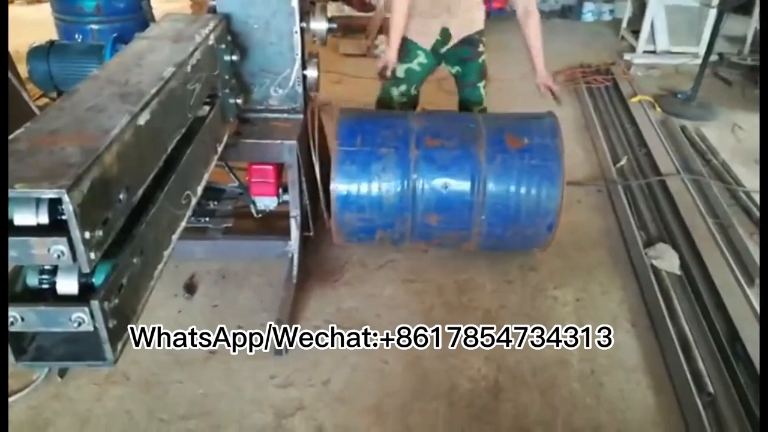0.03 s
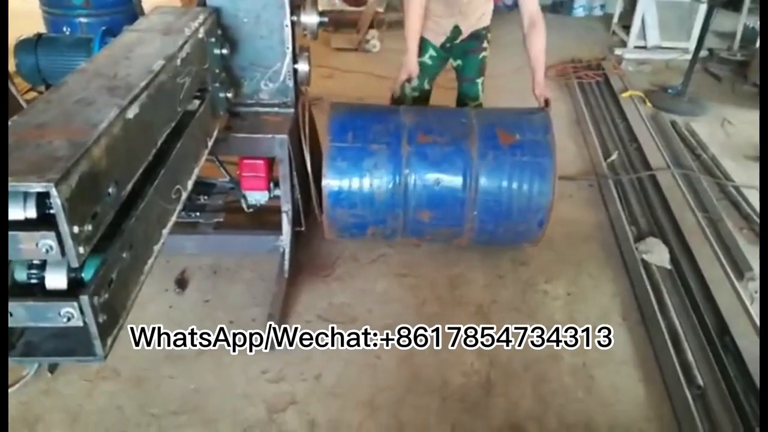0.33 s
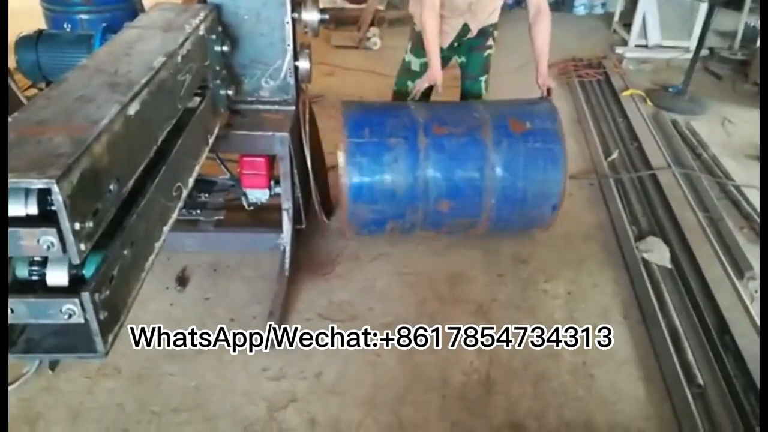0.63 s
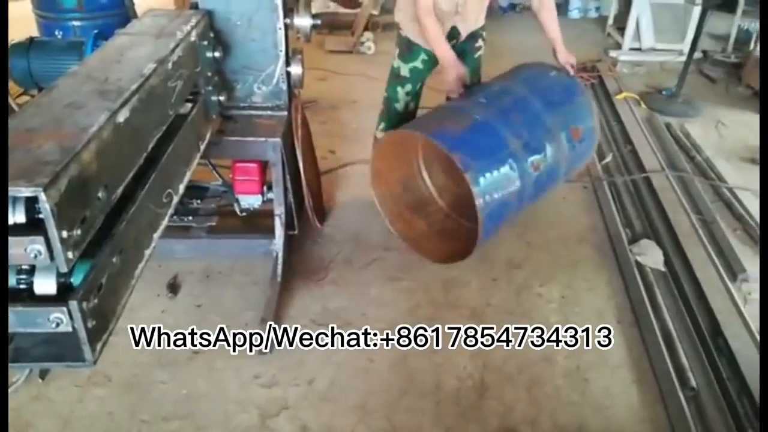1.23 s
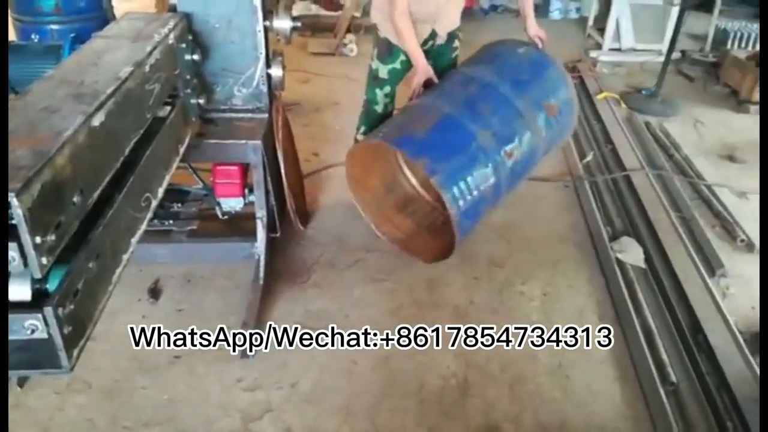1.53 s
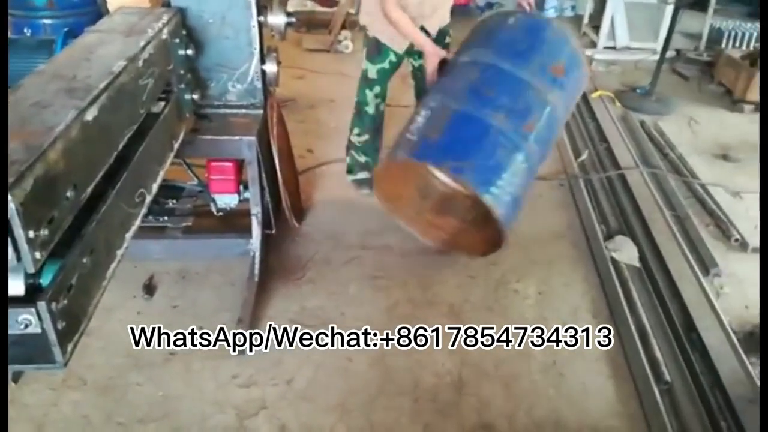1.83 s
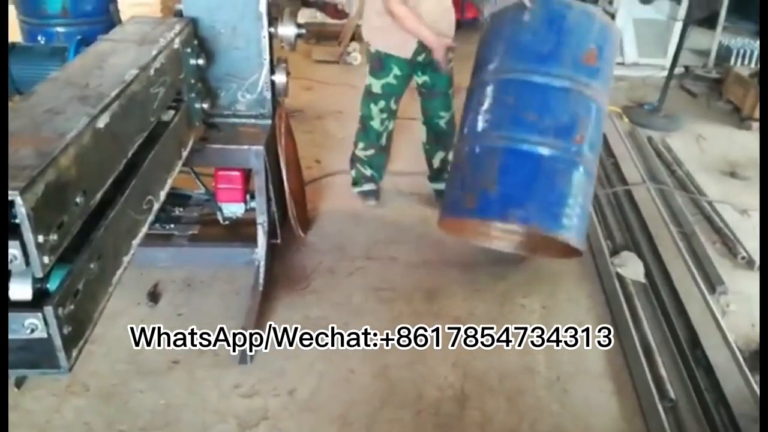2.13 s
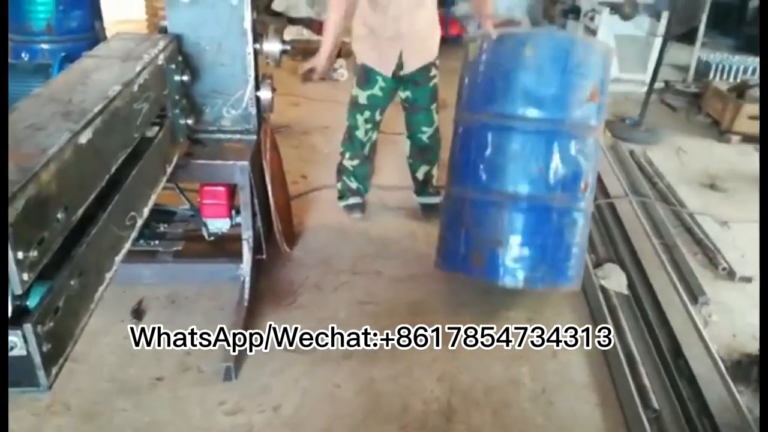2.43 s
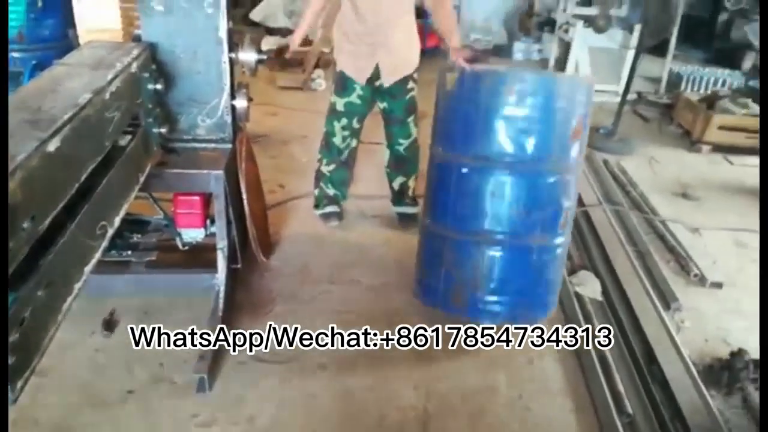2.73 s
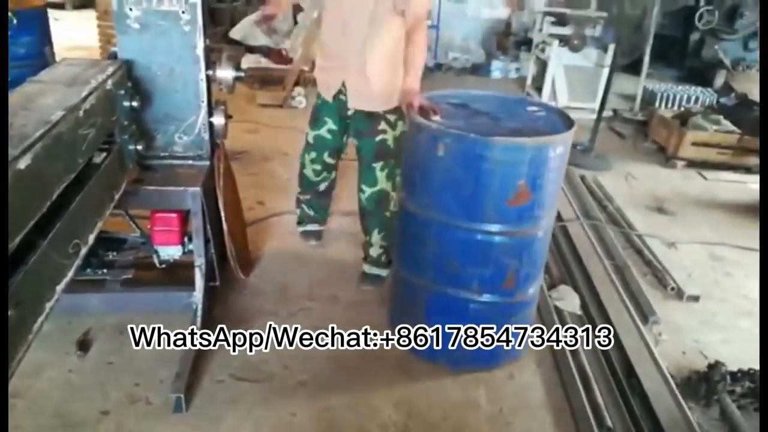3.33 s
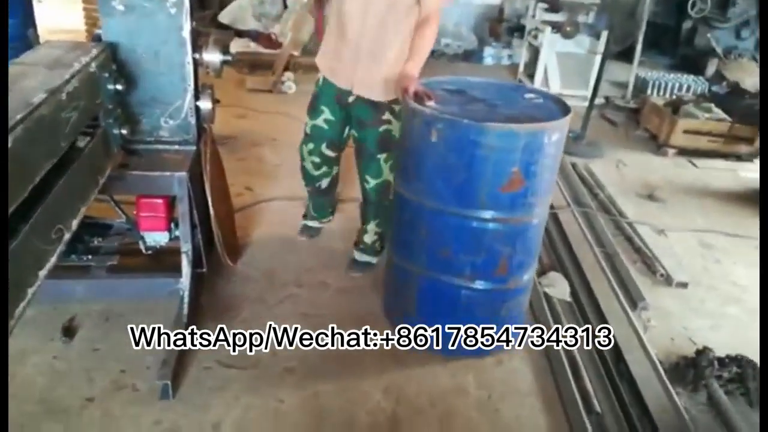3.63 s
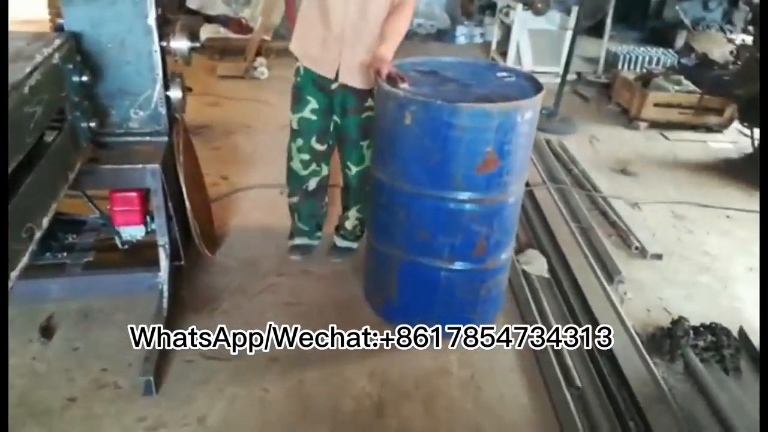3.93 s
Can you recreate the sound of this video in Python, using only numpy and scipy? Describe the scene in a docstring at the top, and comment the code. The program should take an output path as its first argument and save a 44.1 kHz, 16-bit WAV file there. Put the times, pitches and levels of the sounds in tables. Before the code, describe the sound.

Close by in a workshop, a hollow metal barrel grinds and rings on its rim, rocks onto the concrete with several deep bumps and scrapes to a stop. A machine hisses behind it throughout.

```python
"""Workshop, concrete floor: an empty open-ended steel drum is dragged, swung upright on its rim, set
down and slid. Grit under the rim, which catches now and then, sets the shell ringing; the drum booms
as it rocks on to the floor. A machine hisses on the right throughout; at the very end something
there clicks and a thin whine starts."""
import sys
import numpy as np
from scipy import signal
from scipy.io import wavfile

SR = 44100
rng = np.random.default_rng(int(sys.argv[2]) if len(sys.argv) > 2 else 0)


def to_wav(sig):
    """Store sig (one row per channel, or 1-D mono) as 16-bit WAV at the path in sys.argv[1].

    Samples outside -1..1 are clipped; the rate is SR.
    """
    pcm = np.clip(np.atleast_2d(sig), -1, 1) * 32767
    pcm = np.round(pcm).astype(np.int16)
    wavfile.write(sys.argv[1], SR, pcm.T)  # frames by channels


N = 176400
T = np.arange(N) / SR
BAND_EDGES_HZ = np.geomspace(32, 8600, 23)
BAND_CENTRES_HZ = np.sqrt(BAND_EDGES_HZ[1:] * BAND_EDGES_HZ[:-1])
LIFT_S, SET_DOWN_S = 1.45, 2.8


def from_db(db):
    """Decibels to gain."""
    return 10 ** (np.asarray(db) / 20)


def at_hz(table, hz):
    """Table lookup on a log-frequency axis."""
    freqs, values = np.transpose(table)
    return np.interp(np.log(hz), np.log(freqs), values)


def pan(left_minus_right_db):
    """Constant-power left and right gains."""
    gains = from_db([[left_minus_right_db / 2], [-left_minus_right_db / 2]])
    return gains / np.sqrt(np.mean(gains ** 2))


def drift(rate_hz):
    """Slow random wander, standard deviation 1."""
    pole = np.exp(-2 * np.pi * rate_hz / SR)
    slow = signal.lfilter([1], [1, -2 * pole, pole * pole], rng.standard_normal(N + SR))[SR:]
    return slow / slow.std()


def band(x, k):
    """Band k of the filter bank."""
    bandpass = signal.butter(2, BAND_EDGES_HZ[k:k + 2], "band", fs=SR, output="sos")
    return signal.sosfilt(bandpass, x + 1e-18)


def resonance(x, hz, width_hz):
    """Two-pole resonator, peak gain 1."""
    radius = np.exp(-np.pi * width_hz / SR)
    feedforward = np.array([1, 0, -1]) * (1 - radius ** 2) / 2
    feedback = [1, -2 * radius * np.cos(2 * np.pi * hz / SR), radius ** 2]
    return signal.lfilter(feedforward, feedback, x + 1e-18)


def mode_width_hz(t60_s):
    """Bandwidth of a mode with this ring time."""
    return np.log(1000) / (np.pi * t60_s)


def stereo_noise(k, correlation_table, size):
    """Noise in band k, partly correlated between the ears."""
    mid, side = band(rng.standard_normal((2, size + SR // 4)), k)[:, -size:]
    correlation = np.clip(at_hz(correlation_table, BAND_CENTRES_HZ[k]), 0, 1)
    return np.sqrt((1 + correlation) / 2) * mid + np.sqrt((1 - correlation) / 2) * np.array([side, -side])


# hiss spectrum: f/Hz, density/dB
HISS_SPECTRUM = [(40, -22.5), (120, -36.5), (300, -38), (550, -40), (1000, -34), (2100, -40), (3200, -28),
                 (4200, -38), (5100, -46.5), (6200, -35.5), (7300, -62)]
# metallic resonances: f/Hz, width/Hz, level/dB
HISS_PEAKS = [(2760, 70, -25), (3037, 90, -25), (3190, 110, -21.5), (3420, 70, -22.5), (3570, 70, -25),
              (5900, 240, -30)]
# hiss direction: f/Hz, L-R/dB
HISS_PAN = [(300, -2.5), (700, -1.5), (1300, -2), (2400, -11), (7000, -9.5)]
# hiss coherence: f/Hz, L-R correlation
HISS_CORRELATION = [(130, 1), (300, 0.27), (700, 0.076), (3000, .05)]
# hiss envelope: t/s, level/dB
HISS_LEVEL = [(.165, -9), (.2, -4), (.4, -2.5), (1.4, -1), (2.7, -2.5), (3.8, -2)]


def machine_hiss():
    """A machine on the right hisses steadily, with metallic resonances."""
    hiss = 0
    for k, hz in enumerate(BAND_CENTRES_HZ):
        noise = stereo_noise(k, HISS_CORRELATION, N)
        hiss += from_db(at_hz(HISS_SPECTRUM, hz)) * pan(at_hz(HISS_PAN, hz)) * noise
    for hz, width_hz, db in HISS_PEAKS:
        peak = resonance(rng.standard_normal((2, N)), hz, width_hz)
        hiss += from_db(db) * pan(at_hz(HISS_PAN, hz)) * peak
    return hiss * from_db(np.interp(T, *np.transpose(HISS_LEVEL)))


def machine_click(at_s=3.911, hz=2900, width_hz=1100):
    """One small click, right of centre."""
    impulse = from_db(5) * signal.unit_impulse(N, int(at_s * SR))
    return pan(-3.7) * resonance(resonance(impulse, hz, width_hz), hz, width_hz)


def machine_whine(start_s=3.914, rise_s=.012, hz=5141, waver_hz=8, level_db=-32.5):
    """A thin tone on the right, wavering slightly in pitch and level."""
    phase = 2 * np.pi * np.cumsum(hz + waver_hz * drift(33)) / SR
    onset = np.clip((T - start_s) / rise_s, 0, 1)
    return pan(-20) * from_db(level_db + drift(20)) * onset * np.sin(phase)


# joint decay of shell and hall: f/Hz, t60/s
WASH_T60 = [(60, 1), (250, 1.25), (600, 1.04), (1100, 1.5), (2000, 0.65), (3300, 0.59), (7000, 0.47)]
# wash coherence: f/Hz, L-R correlation
WASH_CORRELATION = [(130, .97), (300, .94), (680, .45), (1500, .5), (3400, 0), (7000, .2)]
# drum direction, for wash and shell: f/Hz, L-R/dB
DRUM_PAN = [(330, 0), (700, .5), (1300, 0), (2400, -5.5), (4000, -5), (7000, -2.5)]


def wash(drive):
    """Countless weak shell modes and the hall's echoes die away, treble first."""
    t, response = T[:2 * SR], 0
    for k, hz in enumerate(BAND_CENTRES_HZ):
        decay = from_db(-60 * t / at_hz(WASH_T60, hz))
        noise = stereo_noise(k, WASH_CORRELATION, len(t))
        response += pan(at_hz(DRUM_PAN, hz)) * noise * decay / np.linalg.norm(decay)
    return signal.fftconvolve(drive[None], response, axes=1)[:, :N]


# rim bumps on the floor: t/s, level/dB, contact/s
BUMPS = [(0.778, -22.5, 0.0034), (.808, -21, 0.0022), (0.83, -19.5, 0.0027), (2.887, -8, 0.0083),
         (2.898, -12.5, 0.007), (2.958, -11.5, 0.0082), (3.006, -5.5, 0.01), (3.041, -7.5, 0.0048),
         (3.056, -26, 0.015), (3.095, -11.5, 0.0035), (3.237, -5, 0.0052), (3.262, -15, 0.0031),
         (3.291, -4, 0.0038), (3.317, -15, 0.017)]
# modes of lid and enclosed air: f/Hz, level/dB, t60/s
BOOM_MODES = [(76.7, -5.5, 0.22), (85.7, -11, 0.36), (174, 0, 0.047), (223.7, -5, 0.17), (306, -2, 0.097),
              (366, 1.5, 0.28)]


def booms():
    """Each bump is a soft half-sine push that sets lid and air booming."""
    pushes, boom = np.zeros(N), np.zeros(N)
    for at_s, db, contact_s in BUMPS:
        push = np.sin(np.pi * np.clip((T - at_s) / contact_s, 0, 1))
        pushes += from_db(db) * push / push.sum()
    for hz, db, t60_s in BOOM_MODES:
        width_hz = mode_width_hz(t60_s)
        impulse_gain = SR / (2 * np.pi * width_hz)   # a unit impulse rings at amplitude 1
        boom += from_db(db) * impulse_gain * resonance(pushes, hz, width_hz)
    return boom


def grit(grains_per_s=2200, spread_db=5):
    """Dense tiny impacts of uneven size, rms 1."""
    sizes = from_db(spread_db * np.minimum(rng.exponential(1, N), 5))
    signs = rng.choice([-1, 1], N)
    impacts = sizes * signs * (rng.random(N) < grains_per_s / SR)
    return impacts / impacts.std()


# rim catches: t/s, level/dB, f/Hz
CATCHES = [(0.491, -9, 3150), (.583, -5, 3030), (.799, -4, 3080), (0.953, -11, 2980), (1.008, -11, 2400),
           (1.512, -7.5, 2800), (1.697, 4, 3330), (1.909, -1, 2700), (2.96, -15, 1300), (3.037, -4.5, 1400),
           (3.167, -13.5, 1390), (3.238, 0, 900), (3.301, 4, 2600), (3.336, 3.5, 1790)]


def rim_catches(decay_s=.019, width_hz=1670):
    """The rim catches on the concrete and breaks free in a short crunch."""
    crunches, grains = np.zeros(N), grit()
    for at_s, db, hz in CATCHES:
        burst = grains * (T >= at_s) * np.exp(-np.abs(T - at_s) / decay_s)
        crunches += from_db(db) * resonance(resonance(burst, hz, width_hz), hz, width_hz)
    return crunches


def grinding(moves, judder_db=2.2, judder_hz=21.5):
    """The juddering rim crushes grit; each move has its own force envelope and spectrum."""
    forces = [from_db(np.interp(T, *np.transpose(level), left=-120, right=-120)) for level, _ in moves]
    grains = grit(), grit()   # neighbouring bands get independent grit
    scrape = 0
    for k, hz in enumerate(BAND_CENTRES_HZ):
        gain = sum(force * from_db(at_hz(spectrum, hz)) for force, (_, spectrum) in zip(forces, moves))
        scrape += gain * band(grains[k % 2], k)
    return scrape * from_db(judder_db * drift(judder_hz))


# grinding force per move: t/s, level/dB
DRAG_LEVEL = [(.3, -48), (.47, -34), (.495, -18), (.57, -19.5), (.6, -18), (.69, -11.5), (.81, -12.5),
              (.86, -19), (.93, -20.5), (.96, -17), (1.12, -24), (1.2, -41), (1.4, -31.5)]
SWING_LEVEL = [(1.495, -24), (1.51, -20), (1.56, -21), (1.64, -13), (1.7, -8), (1.8, -6), (1.91, -7.5),
               (1.95, -35.5), (2.04, -28), (2.12, -48), (2.3, -43.5)]
EDGE_ROLL_LEVEL = [(1.8, -37), (1.95, -10), (2.05, -15), (2.15, -37), (2.25, -21)]
RUMBLE_LEVEL = [(.2, -45), (.42, -33.5), (.62, -22), (.76, -11), (.81, -6), (.87, -24), (1.12, -14.5),
                (1.3, -22.5), (1.45, -23.5), (1.7, -20), (2, -28), (2.15, -25), (2.3, -32.5)]
# grinding spectrum per move: f/Hz, density/dB
DRAG_SPECTRUM = [(40, -21), (90, -1.5), (135, -20.5), (280, -2.5), (480, -7), (700, 0.5), (1100, 0),
                 (2100, -2), (3100, 1.5), (4400, -5), (7300, -6.5)]
SWING_SPECTRUM = [(40, -4), (80, -10), (130, -31), (230, -11.5), (400, -6), (650, -14), (1000, -2),
                  (1500, 0.5), (2100, 0), (3300, 6.5), (4100, -4), (5200, -4), (7300, -5.5)]
EDGE_ROLL_SPECTRUM = [(100, -8), (350, -8.5), (650, -3.5), (900, 0), (1500, -6.5), (2400, -4),
                      (7000, -27.5)]
RUMBLE_SPECTRUM = [(40, -3.5), (75, -3.5), (100, -4), (135, -13.5), (180, -0.5), (300, -7.5), (420, -10),
                   (560, -31), (1200, -23.5), (7000, -50)]


def drag_and_swing():
    """The tilted drum is dragged, swung up and rolled on its edge; its hollow wall rumbles."""
    return grinding([(DRAG_LEVEL, DRAG_SPECTRUM), (SWING_LEVEL, SWING_SPECTRUM),
                     (EDGE_ROLL_LEVEL, EDGE_ROLL_SPECTRUM), (RUMBLE_LEVEL, RUMBLE_SPECTRUM)])


# upright grinding force and wall judder: t/s, level/dB
SLIDE_LEVEL = [(2.89, -23), (2.97, -25.5), (3.02, -12.5), (3.06, -9.5), (3.11, -22), (3.21, -21),
               (3.24, -18), (3.29, -17.5), (3.335, -7), (3.41, -14), (3.49, -18), (3.58, -28.5),
               (3.72, -53)]
JUDDER_LEVEL = [(2.9, -5), (3, -35), (3.05, 4), (3.14, -13.5), (3.22, -8), (3.26, 7.5), (3.32, -8.5),
                (3.45, -34.5), (3.55, -27)]
# upright grinding spectrum: f/Hz, density/dB
SLIDE_SPECTRUM = [(40, -20), (85, 14), (135, -6), (230, 3.5), (400, 8), (520, 3.5), (1000, 3), (3200, 2.5),
                  (4500, -10), (7300, -16)]


def slide():
    """The upright drum slides over grit; its wall rumbles as it judders."""
    return grinding([(SLIDE_LEVEL, SLIDE_SPECTRUM), (JUDDER_LEVEL, RUMBLE_SPECTRUM)])


def wall_flex(ring, pitch_share=.002, rate_hz=14):
    """The thin wall flexes as it is handled, so the pitch of its ring wavers."""
    warped_s = T + np.cumsum(pitch_share * drift(rate_hz)) / SR
    return np.array([np.interp(warped_s, T, ear) for ear in ring])


def upper_modes(drive, count=36, range_hz=(2200, 4400), t60_s=.46, gain_db=-4.5):
    """A crowd of higher shell modes, each radiating in its own direction."""
    ring = 0
    for k, (offset, direction) in enumerate(rng.random((count, 2))):
        hz = np.interp(k + offset, [0, count], range_hz)
        angle = np.pi * direction
        ears = np.sqrt(2) * np.array([[np.cos(angle)], [np.sin(angle)]]) * pan(at_hz(DRUM_PAN, hz))
        ring += ears * resonance(drive, hz, mode_width_hz(t60_s))
    return from_db(gain_db) * ring


# strongest shell modes: f/Hz, t60/s, lying level/dB, swung level/dB, upright level/dB
SHELL_MODES = [(75, 2.6, 11, 16, 7), (97, 1.1, 14, 6, 2), (171, 1.0, 7, 0, 2), (192, .5, 7, 0, 4),
               (217, 1.1, 8, 4, -1), (231, .6, 8, 11, 5), (271, .8, 6, 3, 3), (342, .6, 6, 5, 7),
               (391, 1.0, 6, 10, 2), (435, 1.5, 10, 1, 15), (550, 1.0, 3, 6, 0), (669, .9, 9, 2, 2),
               (749, .8, 3, -3, 3), (816, 1.1, 3, 12, 0), (879, 1.0, 3, 13, -3), (931, .8, 6, -3, 8),
               (958, .7, 0, 5, -1), (1020, 1.0, 4, 7, 5), (1068, .6, 5, 11, 3), (1135, .8, 3, 1, 3),
               (1162, 1.0, 3, 6, -2), (1210, .9, 2, 5, 1), (1313, .95, 0, 8, -2), (1335, .8, 2, 8, 3),
               (1386, .7, 1, 9, -1), (1455, .8, 0, 3, 9), (1515, .7, 4, 1, 0), (1585, .8, 3, 13, 0),
               (1626, .7, -1, 5, -1), (1744, .7, 1, 7, 0), (1782, .7, 0, 5, 0), (2643, .55, -1, 4, 1),
               (2952, .55, 4, 5, 2), (3060, .55, 5, 6, 1), (3286, .55, 5, 6, 3), (3424, .55, 4, 7, 4),
               (3748, .55, 1, 4, 0), (3910, .55, 1, 4, 0), (4049, .55, 1, 4, 0)]
# floor damping when upright, strongest in the bass: f/Hz, t60 factor
UPRIGHT_T60_FACTOR = [(100, 0.19), (200, 0.97), (450, 1), (1000, 0.8)]


def shell_modes(tilted, upright, nodes_per_s=2.6, node_depth=.6):
    """The steel rings; while tilted, the contact point passes each mode's nodes, so modes swell and fade."""
    ring = 0
    for hz, t60_s, lying_db, swung_db, upright_db in SHELL_MODES:
        speed, phase = rng.random(2)
        coupling = 1 + node_depth * np.cos(2 * np.pi * (nodes_per_s * (.5 + speed) * T + phase))
        tilt_gain = np.where(T > LIFT_S, from_db(swung_db), from_db(lying_db))
        mode = resonance(tilted * coupling * tilt_gain, hz, mode_width_hz(t60_s))
        upright_t60_s = t60_s * at_hz(UPRIGHT_T60_FACTOR, hz)
        mode += from_db(upright_db) * resonance(upright, hz, mode_width_hz(upright_t60_s))
        ring += pan(at_hz(DRUM_PAN, hz)) * mode
    return ring


def scene():
    """Rim noise drives shell and hall; the drum booms; the machine runs behind."""
    crunches = rim_catches()
    tilted = drag_and_swing() + crunches * (T < SET_DOWN_S)
    upright = slide() + crunches * (T >= SET_DOWN_S)
    scrape, boom = tilted + upright, booms()
    ring = wall_flex(shell_modes(tilted, upright) + upper_modes(scrape))
    direct = from_db(-12) * pan(-1.5) * scrape
    tail = from_db(-4.5) * wash(scrape + from_db(-29) * boom)
    return ring + direct + boom + tail + machine_hiss() + machine_click() + machine_whine()


def record(dry, mono_below_hz=225, low_cut_hz=75, high_cut_hz=7620, peak_limit=.88):
    """Close microphone pair: mono bass, low cut, rounded peaks, steep high cut."""
    mid, side = (dry[0] + dry[1]) / 2, (dry[0] - dry[1]) / 2
    side = signal.sosfiltfilt(signal.butter(4, mono_below_hz, "high", fs=SR, output="sos"), side)
    low_cut = signal.butter(2, low_cut_hz, "high", fs=SR, output="sos")
    stereo = signal.sosfilt(low_cut, [mid + side, mid - side])
    rounded = stereo / (1 + (stereo / peak_limit) ** 6) ** (1 / 6)
    return signal.sosfilt(signal.ellip(16, .2, 90, high_cut_hz, fs=SR, output="sos"), rounded)


dry = scene()
out = record(dry)
to_wav(out)
```